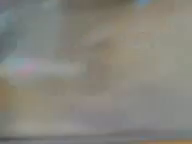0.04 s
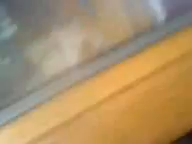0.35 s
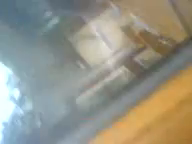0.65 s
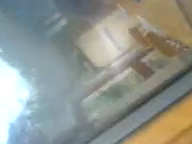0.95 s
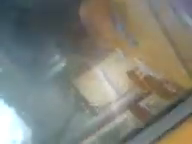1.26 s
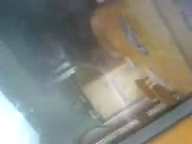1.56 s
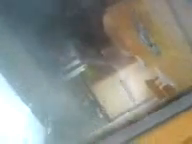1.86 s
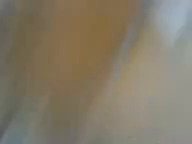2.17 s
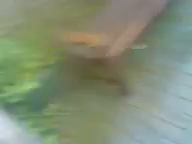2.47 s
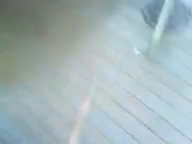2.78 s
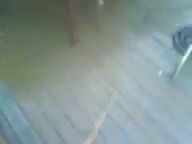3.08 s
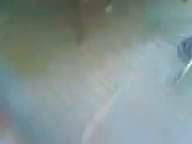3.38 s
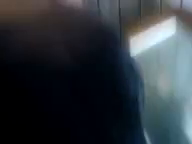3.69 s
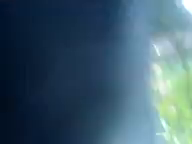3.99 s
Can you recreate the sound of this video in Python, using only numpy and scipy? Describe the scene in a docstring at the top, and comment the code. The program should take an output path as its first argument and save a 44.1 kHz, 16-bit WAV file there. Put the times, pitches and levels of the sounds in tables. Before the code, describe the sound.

Steady heavy rain, heard from beside a window through a hand-held microphone with little treble, hisses and drums on the roof amid sharp close drips. The sound shifts toward splashing on the open wooden deck, then comes one hollow knock.

```python
"""Heavy rain on a wooden deck

Heard from beside a window through a narrow-band hand-held recorder. Countless drops patter over a
wash and drum on the roof; fat drips smack down close by and overload the input. At about 2.5 s the
microphone swings toward the open deck: the drumming recedes and the splashing fills out.
Near the end a board gives one hollow knock."""
import sys
import numpy as np
from scipy import signal
from scipy.fft import rfft, irfft, next_fast_len
from scipy.io import wavfile
from scipy.ndimage import uniform_filter1d, minimum_filter1d

SR = 44100
rng = np.random.default_rng(int(sys.argv[2]) if len(sys.argv) > 2 else 0)


def master_out(mix):
    """Clip the mix to full scale and print it as 16-bit PCM to the path in sys.argv[1]."""
    frames = np.transpose(np.atleast_2d(mix))
    ceiling = np.clip(frames, -1, 1)
    pcm = np.round(ceiling * 32767).astype(np.int16)
    wavfile.write(sys.argv[1], SR, pcm)


N = 176400

# EQ of the rain beside the window and over the open deck: f/Hz, level/dB
WINDOW_EQ = [(30, -27), (95, -11.5), (170, -12.5), (250, -10), (400, -7), (650, -8.5), (950, -13.5),
             (1250, -8), (1550, -4), (1950, -7), (2550, -2), (3000, -2.5), (3400, -0.5), (4500, -0.5)]
DECK_EQ = [(30, -29), (100, -12.5), (165, -15), (260, -10), (400, -16.5), (600, -6.5), (900, -10),
           (1350, -6), (1650, -5.5), (2150, -2.5), (2700, -3.5), (3350, -0.5), (4500, -1.5)]
# fader ride of the splashing: t/s, level/dB
SPLASH_FADER = [(0, -19.5), (.2, -18), (.45, -17), (.68, -18.5), (.8, -18), (1.15, -17.5), (2.45, -17.5),
                (2.6, -15.5), (2.95, -17), (3.35, -18.5), (3.8, -18), (4, -21.5)]


def splashing(turn_at_s=2.54, turn_length_s=0.24):
    """Wash and patter crossfade from window tone to deck tone as the microphone turns."""
    rain = amp(-0.5) * wash() + amp(2.5) * patter()
    at_window = unit(equalise(rain, WINDOW_EQ))
    on_deck = unit(equalise(rain, DECK_EQ))
    turned = np.clip((np.arange(N) / SR - turn_at_s) / turn_length_s + .5, 0, 1)
    return fader(SPLASH_FADER) * ((1 - turned) * at_window + turned * on_deck)


def patter(spots=24, drops_per_s=2200, decay_cycles=1.34):
    """Drops on wet boards: each spot answers with a tick of a few cycles and its own echoes."""
    t, out = np.arange(1024) / SR, np.zeros(N)
    for hz in np.linspace(700, 3800, spots):
        tick = np.sin(2 * np.pi * hz * t) * np.exp(-hz * t / decay_cycles)
        hits = impacts(drops_per_s / spots, spread_db=4)
        out += unit(porch_echoes(signal.oaconvolve(hits, tick)[:N]))
    return unit(narrow_band(out))


def wash(patch_db=3, flicker_db=3):
    """Distant drops merge into a hiss with shifting patches of colour and a quick flicker."""
    real, imag, patches = rng.standard_normal((3, 257, N // 128 + 5))  # frequency by time
    patches = uniform_filter1d(patches, size=7, axis=0)
    patches = unit(uniform_filter1d(patches, size=14, axis=1))
    flicker = unit(uniform_filter1d(rng.standard_normal(real.shape[1]), size=6))
    spectrogram = (real + 1j * imag) * amp(patch_db * patches + flicker_db * flicker)
    hiss = signal.istft(spectrogram, nperseg=512, noverlap=384)[1][:N]
    return unit(narrow_band(hiss))


# fat drips landing close by: t/s, smack level/dB, relative ring level/dB, f/Hz
FAT_DRIPS = [(0.0148, -2.5, -8.5, 2506), (0.0198, -5, -9.5, 2595), (0.0262, -0.8, -4.5, 2603),
             (0.0276, 2.2, -8, 2656), (0.042, 0, 1, 2532), (0.0458, 2, -5, 2690), (0.0491, -1, -10, 2640),
             (0.0988, -0.4, -7.5, 2715), (0.1066, -11.5, -7.5, 2533), (0.1417, 0.5, -7.5, 2904),
             (0.1465, -2.0, -5, 3110), (0.1558, -6.5, -4.5, 2810), (0.1953, -3, -13, 2525),
             (0.2071, -2.4, -8, 2840), (0.2363, -2, -13, 3060), (0.529, -0.5, -8, 3160),
             (0.6246, -2.3, -14.5, 3010), (0.7416, -3.5, -5, 2830), (0.7815, -7.5, -2, 2920),
             (0.7884, -1, -12.5, 2880), (0.7945, -3.1, -7.5, 3030), (0.8003, -3, -6.5, 3205),
             (0.8087, -5.0, -15.5, 3040), (0.822, -10, -17.5, 2970), (0.8637, -1.1, -16, 2606),
             (0.9062, -11.5, -2.5, 3060), (0.9975, -1.8, -3, 2465), (1.1234, -1.3, -8, 2900),
             (1.1383, -4.5, -8.5, 3135), (1.3652, -3, -17, 2830), (1.5341, -3.2, -6, 3100),
             (1.6267, -2.5, -11, 3060), (1.678, -0.0, -6, 3145), (1.69, -1.5, -12, 2770),
             (1.8201, -2.5, -10, 2946), (1.8535, -3.5, -10, 2500), (1.9642, -3, -13.5, 2960),
             (2.0269, -0.9, -6.5, 3245), (2.0852, 1.1, -2.5, 3223), (2.3934, -1, -11, 3160),
             (2.5127, -3, -14.5, 2640), (2.5304, 4.5, -0.5, 3283), (2.5337, 5.2, 2.5, 3377),
             (2.5368, 4.3, -8, 2770), (2.7096, 0, -8, 2700), (2.7137, -2, -8, 2390),
             (2.8513, -7.5, -12.5, 2826), (3.0516, -5.5, -4.5, 3262), (3.315, -2.0, -7.5, 2540),
             (3.5237, -3.5, -9.5, 2690), (3.6857, -7, -4, 2230), (3.6915, -1, -5.5, 3040)]


def fat_drips(smack_width_s=.00065, ring_rise_s=0.0011, ring_t60_s=0.051, spray_t60_s=0.21):
    """Each drip smacks, the hardest into overload, then rings roughly inside a wider spray."""
    size, tone_share = 6000, 0.48  # the rest of the ring's power is noise
    t = np.arange(size) / SR - .0013  # zero at the crest of the smack
    after = np.maximum(t - smack_width_s, 0)
    attack = np.minimum(after / ring_rise_s, 1)
    smacks, rings = np.zeros(N), np.zeros(N)
    for s, smack_db, ring_db, hz in FAT_DRIPS:
        tone = np.cos(2 * np.pi * hz * t)
        add(smacks, s, amp(smack_db) * tone * np.exp(-(t / smack_width_s) ** 2))
        grit = band_noise(hz, size, width_hz=900)
        ring = np.sqrt(tone_share) * tone + np.sqrt((1 - tone_share) / 2) * grit
        spray = amp(-17.5) * band_noise(hz, size, width_hz=2000)
        tail = ring * decay(after, ring_t60_s) + spray * decay(after, spray_t60_s)
        add(rings, s, amp(ring_db - 1) * attack * tail)
    return overload(narrow_band(smacks)) + narrow_band(rings)


def overload(x, knee=.68, headroom=.04, bias=.05):
    """The input flattens crests above the knee, one side sooner, which adds a bright click."""
    excess = np.maximum(abs(x + bias) - knee, 0)
    return x - np.sign(x) * (excess - headroom * np.tanh(excess / headroom))


# resonances of the roof: f/Hz, relative level/dB, t60/s
ROOF_MODES = [(338, -3, 0.029), (424, -3.5, 0.054), (474.6, -0.5, .05), (536, -1.5, 0.049)]
# fader ride of the drumming: t/s, level/dB
ROOF_FADER = [(0, -27.5), (.45, -25), (.57, -26.5), (.72, -21), (1, -28.5), (1.2, -22.5), (1.47, -25.5),
              (1.6, -27), (2.2, -25), (2.45, -26), (2.65, -33.5), (3.3, -34), (4, -28.5)]


def roof_drumming(drops_per_s=500):
    """Drops drum on the roof and ring its low, damped resonances."""
    t, out = np.arange(6000) / SR, np.zeros(N)
    for hz, db, t60_s in ROOF_MODES:
        attack = 1 - np.exp(-hz * t)
        ring = np.sin(2 * np.pi * hz * t) * attack * decay(t, t60_s)
        hits = impacts(drops_per_s / len(ROOF_MODES), spread_db=3.5)
        out += amp(db) * unit(signal.oaconvolve(hits, ring)[:N])
    return fader(ROOF_FADER) * unit(out)


# fader ride of the small drips: t/s, level/dB
DRIBBLE_FADER = [(0, -14.5), (.16, -16), (.68, -35), (.8, -20.5), (1.1, -18), (1.3, -27), (3, -29.5),
                 (3.6, -18.5), (4, -35)]


def dribble(spots=12, drips_per_s=130, low_hz=2426, high_hz=3348):
    """Smaller drips fall at random and ring the wet surfaces, each spot at its own pitch."""
    t, out = np.arange(3000) / SR, np.zeros(N)
    for hz in np.linspace(low_hz, high_hz, spots):
        ring = np.sin(2 * np.pi * hz * t) + band_noise(hz, len(t), width_hz=900) / 2
        ring *= decay(t, t60_s=0.049)
        hits = impacts(drips_per_s / spots, spread_db=2.2)
        out += signal.oaconvolve(hits, ring)[:N]
    return fader(DRIBBLE_FADER) * unit(narrow_band(out))


# resonances of the knocked board: f/Hz, level/dB
BOARD_MODES = [(880, -18.5), (1060, -18), (1310, -17)]


def board_knock(at_s=3.69, rise_s=0.0044):
    """One hollow knock: a board's modes sound together and die fast."""
    t, out = np.arange(8000) / SR, np.zeros(N)
    ring = sum(amp(db) * np.sin(2 * np.pi * hz * t) for hz, db in BOARD_MODES)
    add(out, at_s, ring * np.minimum(t / rise_s, 1) * decay(t, t60_s=0.093))
    return narrow_band(out)


def porch_echoes(x, wet_db=-2.5, predelay_s=.002):
    """Short scattered reflections from wall, roof and boards."""
    t = np.arange(8192) / SR
    tail = rng.standard_normal(len(t)) * decay(t, t60_s=0.069) * (t > predelay_s)
    return x + amp(wet_db) * signal.oaconvolve(x, tail / np.linalg.norm(tail))[:N]


# treble roll-off of the recorder: f/Hz, level/dB
RECORDER_EQ = [(3000, 0), (3400, 0), (3550, -10.5), (3700, -14.5), (4000, -21), (4300, -31), (4600, -43),
               (5000, -78), (5500, -100)]


def narrow_band(x):
    """The recorder's top end falls away steeply above 3.4 kHz."""
    return equalise(x, RECORDER_EQ)


def impacts(per_s, spread_db):
    """Random impulses: many small, a few large, their size capped."""
    strength = amp(spread_db * np.minimum(rng.exponential(1, N), 3.07))
    return strength * rng.choice([-1, 1], N) * (rng.random(N) < per_s / SR)


def band_noise(hz, size, width_hz):
    """Noise in a bell-shaped band."""
    bell = np.exp(-2 * ((np.fft.rfftfreq(size, 1 / SR) - hz) / width_hz) ** 2)
    return unit(irfft(rfft(rng.standard_normal(size)) * bell, size))


def equalise(x, curve):
    """Applies an EQ curve with rows of f/Hz, level/dB."""
    size = next_fast_len(len(x) + 4096)
    hz, db = np.transpose(curve)
    gain = amp(np.interp(np.log(np.fft.rfftfreq(size, 1 / SR) + 1), np.log(hz), db))
    return irfft(rfft(x, size) * gain, size)[:len(x)]


def fader(points):
    """Gain at every sample from rows of t/s, level/dB."""
    return amp(np.interp(np.arange(N) / SR, *np.transpose(points)))


def decay(t, t60_s):
    """Envelope that falls 60 dB in t60_s."""
    return amp(-60 * t / t60_s)


def amp(db):
    """Decibels to gain."""
    return 10 ** (np.asarray(db) / 20)


def unit(x):
    """Scales to rms 1."""
    return x / np.sqrt(np.mean(x ** 2) + 1e-20)


def add(mix, s, sound):
    """Drops a sound into the mix at s seconds."""
    part = mix[max(round(s * SR), 0):][:len(sound)]
    part += sound[:len(part)]


def scene():
    """All the rain at one microphone."""
    return (splashing() + roof_drumming() + dribble() + fat_drips() + board_knock())[None]


def record(dry, threshold=.75, cutoff_hz=15900):
    """A fast limiter holds down the loudest drips; a high cut follows."""
    peak = -minimum_filter1d(-abs(dry), size=89)
    reduction = np.maximum(peak / threshold, 1)
    reduction = uniform_filter1d(uniform_filter1d(reduction, size=45), size=45)
    high_cut = signal.firwin(511, cutoff_hz, window=("kaiser", 9), fs=SR)
    return signal.oaconvolve(dry / reduction, high_cut[None], "same")


dry = scene()
out = record(dry)
master_out(out)
```